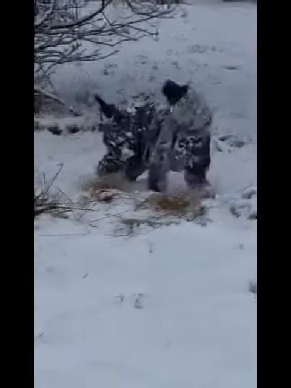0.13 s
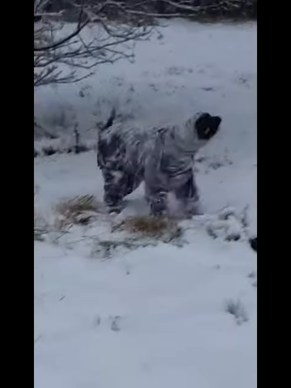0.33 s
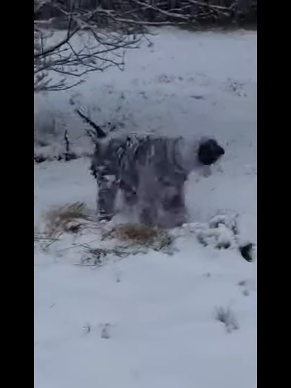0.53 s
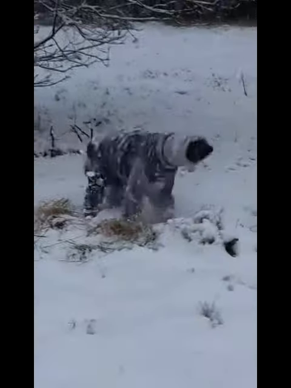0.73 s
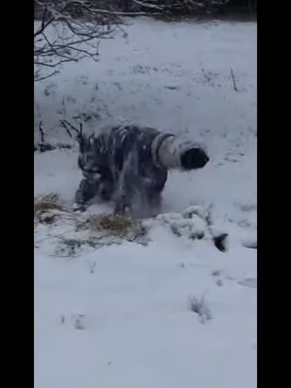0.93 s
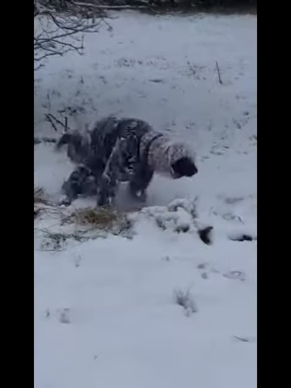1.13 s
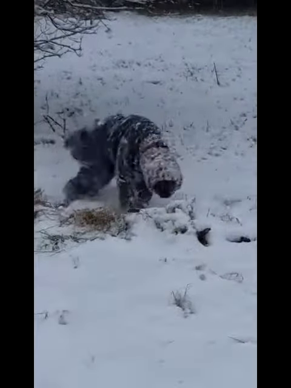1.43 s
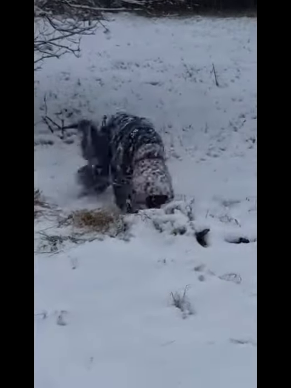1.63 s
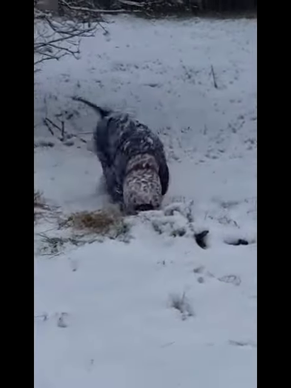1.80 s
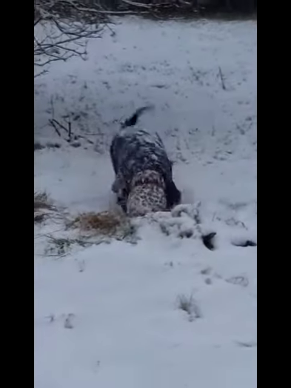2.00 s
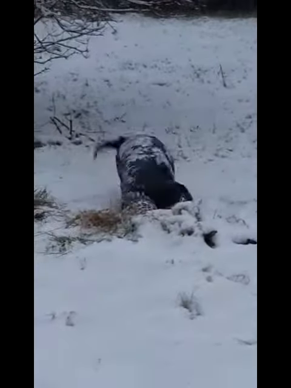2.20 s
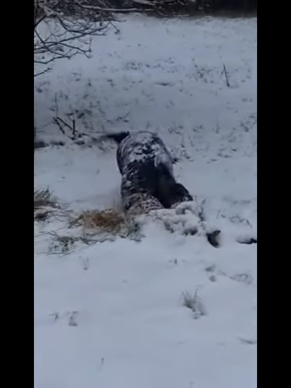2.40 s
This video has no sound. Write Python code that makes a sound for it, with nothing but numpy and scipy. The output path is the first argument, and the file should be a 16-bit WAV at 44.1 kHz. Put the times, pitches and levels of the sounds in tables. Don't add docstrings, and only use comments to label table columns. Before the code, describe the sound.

Bright metallic clinks of a dog's collar tag as it trots through snow, with low wind rumble

```python
import sys
import numpy as np
from scipy import signal
from scipy.fft import rfft, irfft
from scipy.io import wavfile
from scipy.ndimage import uniform_filter1d

SR = 44100
rng = np.random.default_rng(int(sys.argv[2]) if len(sys.argv) > 2 else 0)


def wav_out(sig):
    wavfile.write(sys.argv[1], SR, np.round(np.clip(np.atleast_2d(sig).T, -1, 1) * 32767).astype(np.int16))


def level_to_linear(level):
    exponent = np.asarray(level, float) / 20
    return 10 ** exponent


N = 112454
F = np.fft.rfftfreq(N, 1 / SR)
T = np.arange(N) / SR


def curve(table, col):
    points = np.array(table)
    return np.interp(T, points[:, 0], points[:, col])


def over_hz(table, col, hz):
    points = np.array(table)
    return np.interp(np.log(hz + 1), np.log(points[:, 0]), points[:, col])


def colour(x, table, size=1024):
    response = level_to_linear(over_hz(table, 1, np.fft.rfftfreq(size, 1 / SR)))
    cepstrum = irfft(np.log(response))
    cepstrum[1:size // 2] *= 2
    cepstrum[size // 2 + 1:] = 0
    impulse = irfft(np.exp(rfft(cepstrum)))
    return signal.fftconvolve(x, np.atleast_2d(impulse), axes=-1)[..., :N]


def unit(x):
    return x / np.sqrt(np.mean(x ** 2, axis=-1, keepdims=True))


def walk(rate, channels=2):
    hold = int(SR / rate)
    held = np.repeat(rng.standard_normal((channels, N // hold + 1)), hold, axis=1)
    slewed = uniform_filter1d(uniform_filter1d(held, hold), hold)
    return unit(slewed[:, :N])


def ring(start, modes, db, choke=1):
    attack_s = 0.00082
    t = np.maximum(T - start, 0)
    t = t[(t > 0) & (t < .3)]
    modal = sum(level_to_linear(db + mode_db - 60 * (t / t60) ** choke) * np.sin(2 * np.pi * hz * t)
                for hz, mode_db, t60 in modes)
    out = np.zeros(N)
    out[int(start * SR) + 1:][:len(t)] = (1 - np.exp(-t / attack_s)) * modal
    return out


def burst(start, length, noise):
    near = slice(int(start * SR), int((start + .12) * SR))
    t = T[near] - start
    rise = np.clip(t / (0.00018 + 0.16 * length), 0, 1)
    shape = rise * np.exp(-np.maximum(t - length, 0) / (0.00053 + 0.3 * length))
    heard = np.sum((shape * noise[..., near]) ** 2, axis=-1, keepdims=True)
    out = np.zeros(noise.shape)
    out[..., near] = shape * np.sqrt(np.sum(shape ** 2) / heard)
    return out


# start_s, high_ring_db, second_ring_db, knock_db
STRIKES = [
    (0.2441, -34, -33.5, -90),
    (0.4072, -61, -38.5, -59.5),
    (.6398, -22.5, -35, -80),
    (0.8474, -39, -45, -50),
    (1.0347, -70, -59, -47.5),
    (1.048, -22.5, -32.5, -77),
    (1.2224, -15.5, -32, -41),
    (1.3903, -30.5, -31.5, -36),
    (1.5655, -32, -38, -49.5),
    (2.49, -52.5, -62, -82),
]
# pitch_hz, level_db, t60_s
HIGH_RING = [(13240, -3.5, 0.021)]
SECOND_RING = [(11250, 2, .024), (9600, -2, .02), (8700, -3, .015)]
KNOCK = [(2390, 5.5, 0.0096), (3610, -3, 0.0048)]
# start_s, level_db, share of the knock pitch
TAPS = [(0.4067, -61.5, 0.77), (.4055, -62, 2.5), (0.845, -55, .54), (1.036, -58, .58), (.5778, -71, 0.76),
        (0.5894, -55, .94), (0.594, -62.5, 1.7), (0.6192, -80, 1.4), (0.6375, -50.5, 1.7), (.64, -53, 1.78),
        (.7, -66, 0.99), (0.793, -61, 0.756), (.7925, -75.5, 1.8), (1.294, -68.5, 0.75)]
CHOKE = 1.5


def tag_rings():
    out = np.zeros(N)
    for s, high_db, second_db, knock_db in STRIKES:
        out += ring(s, HIGH_RING, high_db, CHOKE)
        out += ring(s, SECOND_RING, second_db)
        out += ring(s, KNOCK, knock_db, CHOKE)
    for s, db, share in TAPS:
        out += ring(s, [(KNOCK[0][0] * share, 0, 0.029)], db, CHOKE)
    return out


# pitch_hz, level_db, t60_s
HIGH_HUM = [(13240, -29, 0.2), (11700, -31.5, 0.034), (7330, -48, 0.2)]
SECOND_HUM = [(11255, -10.5, 0.14), (3650, -43, 0.45), (4100, -46, 0.23)]


def tag_hum():
    ragged = walk(400)
    return sum(ragged[0] * ring(s, HIGH_HUM, high_db) + ragged[1] * ring(s, SECOND_HUM, second_db)
               for s, high_db, second_db, _ in STRIKES)


# pitch_hz, width_hz, level_db
JINGLE = [(13250, 330, 0), (3680, 130, -12), (7600, 150, -14)]
# time_s, level_db
SWING = [(0, -91.5), (.3, -81), (.6, -85), (1.1, -80), (1.6, -83), (1.78, -92), (1.88, -81), (2.02, -94),
         (2.55, -91)]


def tag_jingle():
    out = np.zeros(N)
    for hz, width, db in JINGLE:
        band = np.exp(-((F - hz) / width) ** 2)
        out += level_to_linear(db) * unit(irfft(rfft(rng.standard_normal(N)) * band, N))
    return out * level_to_linear(curve(SWING, 1) + 4 * walk(18, channels=1)[0])


# start_s, level_db, length_s, low_part_db
RATTLES = [(0.23, -51.5, 0.0067, -6), (0.243, -46.5, 0.0039, -27), (0.4052, -35, 0.0027, 1.5),
           (0.636, -43, 0.00053, -20), (0.6381, -32.5, 0.0044, -13), (0.656, -51.5, 0.0032, -25),
           (0.841, -48.5, 0.0037, 6), (0.8447, -32.5, 0.007, 0), (1.029, -54.5, 0.012, -37),
           (1.0347, -29, 0.0032, 2.5), (1.041, -36, 0.0087, -42.5), (1.06, -54, 0.004, -33),
           (1.2199, -39, 0.00068, -16), (1.2225, -29.5, 0.0017, -9.5), (1.386, -63, 0.0012, 10),
           (1.3897, -32, 0.0045, -8), (1.401, -55, 0.026, -16), (1.564, -46, 0.0099, 4)]
# pitch_hz, level_db
RATTLE = [(900, -40), (1400, -31), (3900, -19), (5200, -25), (7000, -19.5), (9400, 1.5), (12000, -11.5),
          (14600, -21), (15600, -42)]


def buckle_rattle():
    rough = rng.standard_normal((1, N)) * level_to_linear(2.5 * walk(1500, channels=1))
    noise = unit(colour(rough, RATTLE))[0]
    high, low = np.zeros(N), np.zeros(N)
    for s, db, length, low_db in RATTLES:
        chatter = burst(s, length, noise) * noise
        high += level_to_linear(db) * chatter
        low += level_to_linear(db + low_db) * chatter
    return irfft(np.where(F < 5700, rfft(low), rfft(high)), N)


# pitch_hz, left_minus_right_db, left_lead_rad
PORTS = [(1110, -2.5, 1.96), (2360, -1.5, 1), (4100, -3, 0.5), (7940, 1.5, 1.92), (8990, 0, 2),
         (8330, 1, 1.5), (10700, -2.5, 1.83), (15000, -0.5, 1)]


def direct_path(clink):
    side = np.array([[.5], [-.5]])
    level = level_to_linear(side * over_hz(PORTS, 1, F))
    lead = np.exp(1j * side * over_hz(PORTS, 2, F))
    return irfft(rfft(clink) * level * lead, N)


def scattered_path(clink):
    scatter_db, t60_s = -21, 0.2
    t = T[:SR // 3]
    echoes = rng.standard_normal((2, len(t))) * level_to_linear(-60 * t / t60_s) * np.clip(t / 0.0027, 0, 1)
    echoes = echoes / np.sqrt(np.sum(echoes ** 2, axis=1, keepdims=True))
    treble = np.diff(clink, 2, prepend=[0, 0])[None] / 3
    return level_to_linear(scatter_db) * signal.fftconvolve(treble, echoes, axes=-1)[:, :N]


# start_s, peak_db, left_minus_right_db
GRAINS = [(0.325, -49, 0), (0.3465, -49, -7), (0.372, -49.5, -10), (.385, -46.5, 0), (0.5405, -41, -4),
          (0.551, -69, 13), (0.553, -66, 7), (0.561, -46, 4), (0.5712, -58, 8), (0.578, -42, -4),
          (0.5828, -47.5, -7), (0.587, -68, 7), (0.5942, -45, -12), (.6035, -48, -13), (0.6237, -47, 7),
          (0.698, -47, -11), (0.709, -52, -4), (0.7139, -49, -6), (0.7252, -55, -3), (0.767, -53, 3),
          (0.7902, -48.5, 3), (1.1092, -46, -7), (1.1532, -45.5, -5), (1.2804, -53, -14),
          (1.294, -41.5, -11.5), (1.65, -53, -15), (1.659, -60.5, 5), (1.6678, -46.5, -12),
          (1.695, -49.5, -9.5), (1.708, -53.5, 8), (1.7556, -46, -6), (1.827, -45, -5.5),
          (1.834, -55, -8.5), (1.8553, -47.5, -5.5), (1.9422, -48.5, -5), (1.948, -54, -3.5),
          (1.9836, -55, -14.5), (2.014, -62.5, -3), (2.0412, -52, 4), (2.0784, -55.5, -15),
          (2.225, -56.5, -2.5), (2.3346, -58.5, -13.5), (2.342, -56, -6), (2.358, -53.5, -10),
          (2.374, -48.5, -5.5), (2.4678, -56, -15.5), (2.5018, -47.5, -2), (2.5092, -50, -9.5),
          (2.52, -52.5, -5.5), (2.535, -51, 1), (2.546, -53, -11)]
# pitch_hz, level_db
MIC = [(700, -5), (1650, -22.5), (2300, -8), (3300, -26.5), (5600, -39), (8200, -17), (9900, 0),
       (12300, -17), (14400, -16), (15600, -44)]


def grains():
    noise = unit(colour(rng.standard_normal((2, N)), MIC))
    out = np.zeros((2, N))
    for s, db, pan in GRAINS:
        port_db = db - 5 + np.array([[pan], [-pan]]) / 2
        out += level_to_linear(port_db) * burst(s, .002, noise) * noise
    return irfft(rfft(out) * level_to_linear(-9 * (F < 5700)), N)


def lump():
    start_s, push_s = .5425, .0003
    modes = [(129, 0, 0.023), (480, -1, .016), (850, -16, .01), (1400, -20, .008),
             (2400, -16, .02), (3300, -19, .007), (4000, -20, .006), (5050, -14, .006)]
    push = np.hanning(int(push_s * SR)) / (push_s * SR / 2)
    thump = -np.convolve(ring(start_s, modes, -20.5), push)[:N]
    noise = unit(colour(rng.standard_normal((1, N)), MIC))[0]
    crack = burst(start_s, 0.005, noise) + burst(start_s + 0.00074, 0.0014, noise)
    across_db = np.array([0 * F, np.where(F < 700, -25, -24)])
    return irfft(rfft(thump + level_to_linear(-34) * crack * noise) * level_to_linear(across_db), N)


# middle_s, level_db, length_s, top_hz
SCUFFS = [
    (0.305, -91, 0.039, 3000),
    (0.493, -73.5, 0.027, 2800),
    (0.708, -73, 0.059, 3500),
    (.80, -74.5, 0.077, 4300),
    (1.157, -72, 0.058, 3300),
    (1.288, -79.5, 0.14, 3300),
    (1.39, -69, .03, 4200),
    (1.479, -71.5, 0.035, 2900),
    (1.696, -71, 0.027, 4100),
    (1.829, -71.5, 0.041, 4500),
]


def scuffs():
    low_hz = 1210
    rough = rng.standard_normal((2, N)) * level_to_linear(3 * walk(300))
    noise = rfft(rough) / (1 + (low_hz / (F + 1)) ** 4)
    out = np.zeros((2, N))
    for middle, db, length, top_hz in SCUFFS:
        swell = np.exp(-(2 * (T - middle) / length) ** 2)
        out += level_to_linear(db) * swell * unit(irfft(noise / (1 + (F / top_hz) ** 12), N))
    return out


# time_s, level_db
BUSY = [(0, -70), (.1, -73), (.27, -67.5), (.55, -70), (.75, -66), (1.0, -66), (1.1, -64.5), (1.7, -67.5),
        (2.0, -70.5), (2.28, -75), (2.52, -71)]


def rustle():
    hiss_db, still_db, patter_db, patter_per_s = -4, -81.5, -6, 400
    right_treble_db = 4.5
    hiss = rng.standard_normal((2, N)) * level_to_linear(2 * walk(40))
    ticks = (rng.random((2, N)) < patter_per_s / SR) * level_to_linear(2 * rng.exponential(size=(2, N)))
    ticks = signal.lfilter([1], [1, -.97], ticks) * rng.standard_normal((2, N))
    busy = level_to_linear(curve(BUSY, 1))
    mix = unit(hiss) * (busy * level_to_linear(hiss_db) + level_to_linear(still_db)) + unit(ticks) * busy * level_to_linear(patter_db)
    out = colour(mix, MIC) * 4.82
    tilt_db = np.clip((F - 4000) / 4000, 0, 1) * right_treble_db * np.array([[-.5], [.5]])
    return irfft(rfft(out) * level_to_linear(tilt_db), N)


# pitch_hz, level_db per Hz
WIND_LEFT = [(20, 7), (50, -20.5), (90, -2), (200, -9.5), (450, -13.5), (900, -33), (1500, -38),
             (2500, -49)]
WIND_RIGHT = [(20, -30), (50, -3), (85, 5), (160, -9.5), (400, -20.5), (900, -35), (1500, -49), (2500, -64)]
# time_s, left_db, right_db
GUSTS = [(0, 9.5, -2), (.07, -5, 1), (.28, -2, -3.5), (.5, 1.5, 3), (.65, 6, 0.5), (.85, 6.5, 2),
         (1.0, 0.5, -7), (1.15, 4, 3), (1.35, -2.5, -3.5), (1.5, -0.5, 2), (1.62, 3, -4), (1.8, 2, 8),
         (1.93, 6, 0.5), (2.0, 3, 7.5), (2.08, -3, -3.5), (2.3, 5.5, 3.5), (2.55, -1, 3)]


def wind():
    buffet_db, buffet_per_s = 4, 45
    out = []
    for port, (shape, db) in enumerate([(WIND_LEFT, -56), (WIND_RIGHT, -50.5)]):
        spec = rfft(rng.standard_normal(N)) * level_to_linear(over_hz(shape, 1, F))
        whole = np.std(irfft(spec, N))
        bass = 1 / (1 + (F / 260) ** 2)
        gust = curve(GUSTS, port + 1)
        own = walk(buffet_per_s)
        low = irfft(spec * bass, N) * level_to_linear(gust + buffet_db * own[0])
        high_db = 0.49 * gust + buffet_db * (0.49 * own[0] + 0.55 * own[1])
        high = irfft(spec * (1 - bass), N) * level_to_linear(high_db)
        out.append((low + high) * level_to_linear(db) / whole)
    return np.array(out)


def scene():
    clink = tag_rings() + tag_hum() + tag_jingle() + buckle_rattle()
    near_phone = grains() + lump()
    return direct_path(clink) + scattered_path(clink) + near_phone + scuffs() + rustle() + wind()


# pitch_hz, level_db
MUTE = [(600, -116), (1000, -103), (1600, -101), (2400, -101), (3700, -99), (6000, -95.5), (8000, -91),
        (11500, -94), (14500, -95.5)]


def mute(dry, size, count, extra_db):
    follow, ref_db, lone_line_share = 0.792, -75.5, 0.17
    depth_db, knee_db = -36, .5
    hz, _, spec = signal.stft(dry, SR, nperseg=size)
    width = size // 2 // count
    power = abs(spec) ** 2 * size / 1024 + 1e-18
    bands = power[:, :-1].reshape(2, -1, width, spec.shape[2]).mean(2)
    bands = np.pad(np.repeat(bands, width, axis=1), ((0, 0), (0, 1), (0, 0)), mode="edge")
    band_db = 10 * np.log10(bands)
    loud_db = np.maximum(band_db[:, hz > 7000].max(1, keepdims=True) - ref_db, 0)
    floor_db = np.repeat(over_hz(MUTE, 1, hz[width // 2::width]), width)
    floor_db = np.append(floor_db, floor_db[-1])[:, None]
    floor_db = floor_db + follow * loud_db + extra_db * (hz > 900)[:, None]
    over_db = band_db + lone_line_share * (10 * np.log10(power) - band_db) - floor_db
    gain = level_to_linear(depth_db / (1 + np.exp(np.clip(over_db / knee_db, -30, 30))))
    return signal.istft(spec * gain, SR, nperseg=size)[1][:, :N]


def near_sudden(dry):
    sudden_db, reach_s = 15, .018
    edge = (np.diff(dry, 2, prepend=0, append=0) ** 2).sum(0)
    past = uniform_filter1d(edge, size=512, origin=255)[np.maximum(np.arange(N) - 128, 0)]
    sudden = uniform_filter1d(edge, size=128) > level_to_linear(2 * sudden_db) * past
    reached = uniform_filter1d(1. * sudden, int(2 * reach_s * SR)) > 1e-6
    return uniform_filter1d(1. * reached, size=128)


def low_pass(x):
    return signal.sosfilt(signal.butter(12, 15390, fs=SR, output="sos"), x)


def record(dry):
    short = near_sudden(dry)
    short_muted = mute(dry, size=256, count=32, extra_db=4.5)
    long_muted = mute(dry, size=2048, count=128, extra_db=-0.5)
    return low_pass(short * short_muted + (1 - short) * long_muted)


dry = scene()
out = record(dry)
wav_out(out)
```